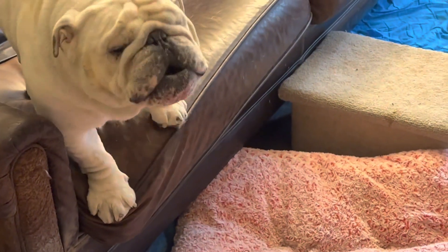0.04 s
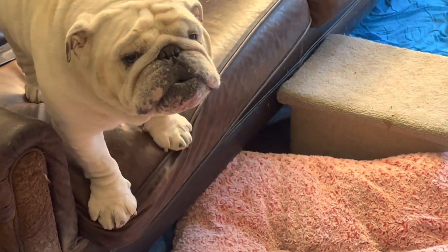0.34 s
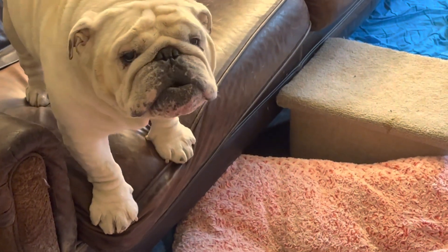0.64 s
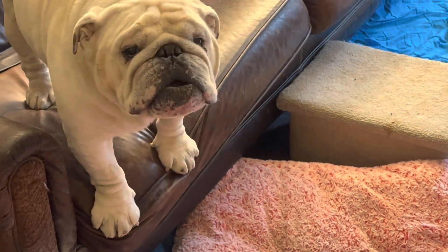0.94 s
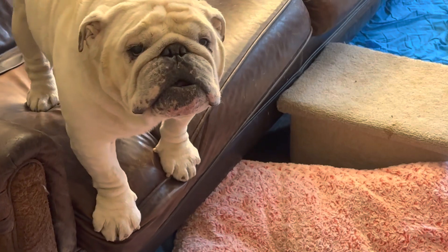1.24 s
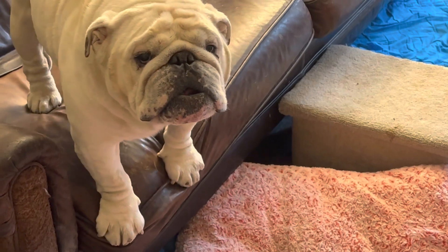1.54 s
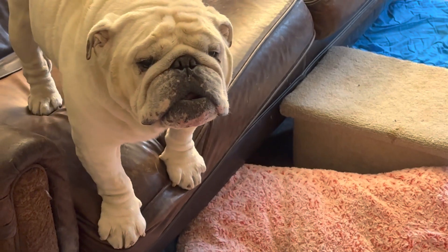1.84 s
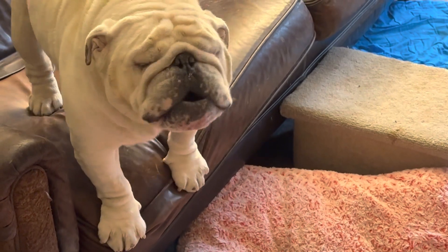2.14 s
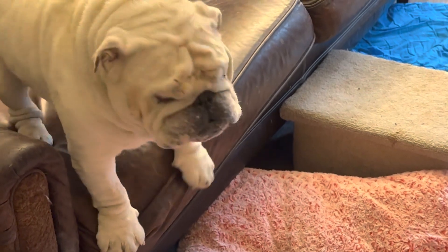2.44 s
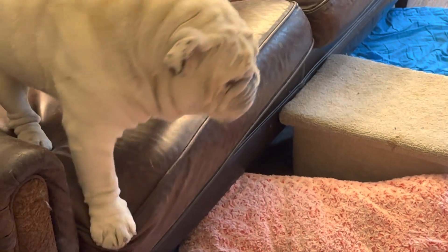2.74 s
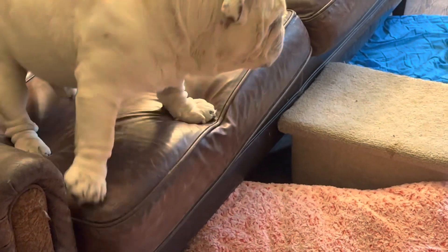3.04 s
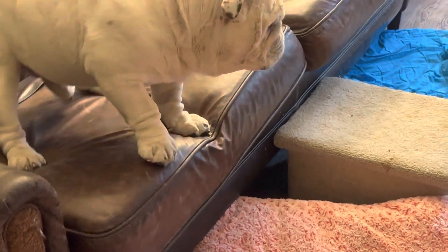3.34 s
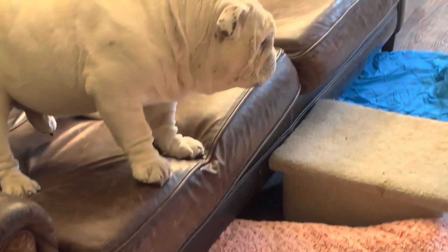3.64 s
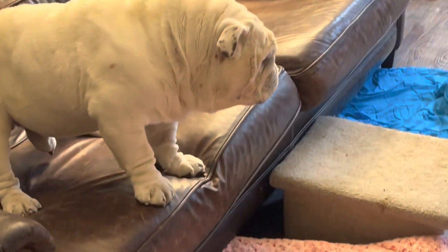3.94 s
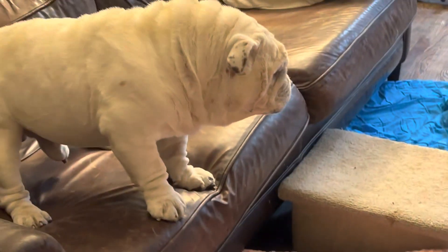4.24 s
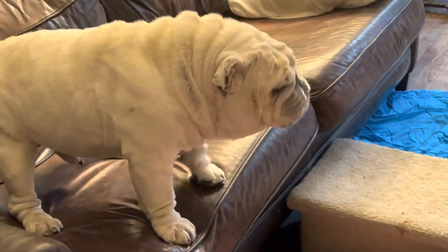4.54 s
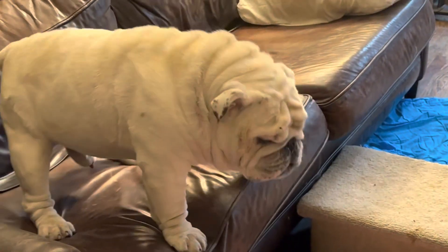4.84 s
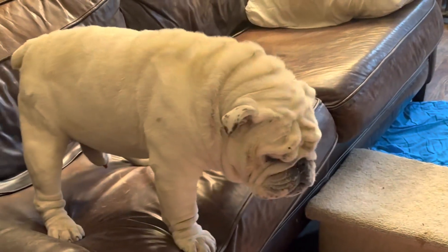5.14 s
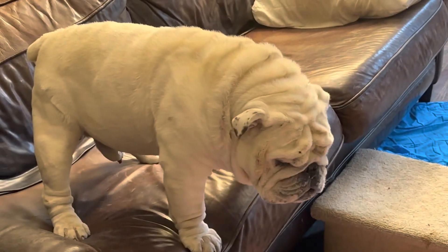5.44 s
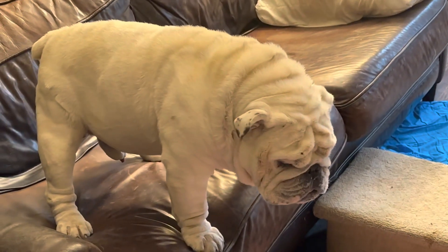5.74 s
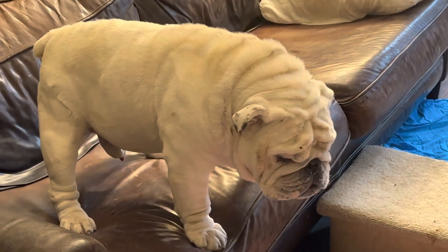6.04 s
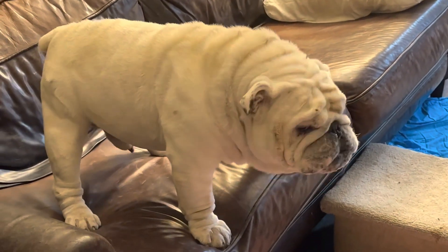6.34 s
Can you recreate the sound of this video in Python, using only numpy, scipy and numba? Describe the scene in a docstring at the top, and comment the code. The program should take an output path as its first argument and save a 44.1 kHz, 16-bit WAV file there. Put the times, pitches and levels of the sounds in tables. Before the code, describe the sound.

Four short, rough dog barks about two seconds apart, with quieter throaty grumbling and snorting in between, close by indoors.

```python
"""A bulldog on a leather couch gives four hoarse barks in a living room, a metre from a phone.
Each bark is a rough voice that rings in throat and mouth and surges as the jowls (loose cheeks) flap.
A snort of air follows the second and third. In between the dog grumbles: its soft palate, at the back
of the mouth, flaps slowly over a low rattle and the hiss of its short nose.
Paws thud twice on the cushion, the room echoes, and the house rumbles faintly."""
import sys
import numpy as np
from scipy import signal
from scipy.fft import rfft, irfft
from scipy.io import wavfile
from scipy.ndimage import uniform_filter1d, minimum_filter1d
from numba import njit

SR = 44100
rng = np.random.default_rng(int(sys.argv[2]) if len(sys.argv) > 2 else 0)


def transcribe(u):
    """Save the signal u as a 16-bit wav file named by the first command-line argument.

    u: samples, shape (n,) or (channels, n), limited to [-1, 1]; the rate is SR.
    q: integer samples, one column per channel.
    """
    v = np.clip(np.atleast_2d(u).T, -1, 1)
    q = np.round(v * 32767).astype(np.int16)
    wavfile.write(sys.argv[1], SR, q)


N = 282668
T = np.arange(N) / SR

# how throat and mouth shape the voice, one list per bark: f/Hz, level/dB
THROATS = [
    [(65, -53), (110, -23), (130, -32.5), (184, -13.5), (231, -16.5), (285, -8), (350, -11.5), (481, -4),
     (599, -6), (690, -17.5), (897, -19.5), (1070, -15.5), (1180, -12), (1500, -37.5), (1950, -74),
     (3300, -120)],
    [(65, -54), (110, -24), (151, -30.5), (194, -6.5), (226, -14), (339, -3), (382, -10), (486, -4),
     (573, -2), (690, -13), (762, -11), (958, -19.5), (1210, -9), (1500, -29), (1950, -60.5), (3300, -120)],
    [(65, -58), (110, -18), (217, -18.5), (252, -15.5), (297, -29.5), (332, -3), (366, -2.5), (456, -1.5),
     (555, -8.5), (612, -11.5), (897, -18.5), (1130, -22), (1220, -19.5), (1500, -24), (1950, -67),
     (3300, -120)],
    [(65, -55), (110, -31.5), (201, -11), (250, -7), (318, -0.5), (400, 4), (441, -12), (497, -1),
     (549, -5.5), (626, 0), (831, -4), (958, -9.5), (1300, -7), (1500, -20), (1950, -49.5), (3300, -120)],
]
# the gliding note at which the nose rings in the long grumble: t/s, f/Hz, level/dB
NOSE_RING = [(.6, 1280, -69), (.86, 1580, -66), (.96, 1630, -49), (1.1, 1673, -58), (1.4, 1820, -65.5),
             (1.75, 1790, -66), (1.95, 1800, -60.5)]


def barks():
    """Vocal folds and puffs of breath ring throat, mouth and muzzle; flapping jowls make it surge."""
    # one bark a row: start/s, length/s, level/dB, mouth at start/dB, mouth at end/dB, snarl/dB, rasp/dB,
    # snarl fade/(dB/s), top pitch/Hz, highest throat ring/Hz, mouth ring at start/Hz, snarl ring/Hz,
    # jowl flapping/Hz, build-up/s
    bark_rows = [(-.04, .17, -14.5, -1.5, -8, -18.5, -24.5, 92, 191.1, 527, 920, 2495, 38.37, .02),
                 (2.09, .176, -15.5, -12.5, 1.5, -22.5, -25.5, 13, 185.9, 542, 1004, 2550, 39.9, 0.0059),
                 (4.26, .18, -15.5, -4, -5.5, -20.5, -24.5, 80.5, 207.7, 392, 1127, 2455, 39.72, 0.0095),
                 (6.136, 0.1848, -17.5, -5.5, -2, 0, -20, 177, 205.7, 614, 1300, 1711, 35.43, 0.015)]
    top_s, rise_hz_per_s, sag_hz_per_s = .05, 480, 290  # the pitch climbs with the push, then sags
    jaw_swing, shut_hz = .66, 740
    out = np.zeros(N)
    for row, throat in zip(bark_rows, THROATS):
        start, length, level_db, open_db, close_db, snarl_db, rasp_db, fade_db_per_s = row[:8]
        top_hz, throat_hz, mouth_hz, snarl_hz, jowl_hz, build_s = row[8:]
        age, gate = envelope(start, length, attack=.014, release=.032)
        progress = age / length
        pitch = top_hz - np.maximum(rise_hz_per_s * (top_s - age), sag_hz_per_s * (age - top_s))
        folds, phase = pulses(pitch, jitter=.1, shimmer_db=1.5)
        breath = unit(rng.standard_normal(len(age)) * np.exp(-phase / 1.7))
        source = colour(unit(folds) + .5 * breath, throat)
        low, high = band(source, 120, 680), band(source, 611, 1500)
        # the lower ring rises and falls with the jaw; the upper one sinks as the mouth shuts
        arch_hz = throat_hz * (1 - jaw_swing * (1 - np.sin(np.pi * progress)))
        sink_hz = mouth_hz + (shut_hz - mouth_hz) * progress
        low = unit(low) + .67 * unit(resonate(low, arch_hz, width_hz=120.))
        mouth = unit(high) + .64 * unit(resonate(high, sink_hz, width_hz=87.))
        mouth_gain = amp(open_db + (close_db - open_db) * progress)
        chest = unit(band(breath, 55, 120, order=3))
        voice = steady(low, .012) + mouth_gain * steady(mouth, .0026) + amp(-31.5) * chest
        snarl, rasp = muzzle(breath + .28 * unit(folds), progress, snarl_hz)
        fade_db = fade_db_per_s * age
        edge = amp(snarl_db - fade_db) * snarl + amp(rasp_db - .48 * fade_db) * rasp
        surge_db = jowls(age, progress, jowl_hz)
        slack = np.exp(-age / build_s)  # the bark starts weak and builds up
        sound = amp(surge_db - 6.5 * slack) * voice + amp(.18 * surge_db - 12.5 * slack) * edge
        add(out, start, gate * amp(level_db) * sound)
    return out


def muzzle(air, progress, snarl_hz):
    """Rushing air rings the muzzle, giving a bright snarl and a higher rasp."""
    # the muzzle's high rings: f/Hz, base width/Hz, level/dB
    muzzle_rings = [(1506, 41, 8), (1766, 83, 3), (1830, 90, 1), (2600, 63, -1.5), (3652, 500, 0.5),
                    (5140, 380, -3), (7130, 500, -1.5), (8320, 660, -1.5), (9100, 660, -5.5),
                    (14000, 2000, -23)]
    rings = 0
    for hz, width, db in muzzle_rings:
        # each ring wavers and sinks as the jaw closes
        centre = hz * (1 + .02 * wander(progress, count=5) + .032 * np.cos(np.pi * progress))
        rings += amp(db) * resonate_twice(air, centre, 1.5 * width)
    ring_hz = snarl_hz * (1 + .02 * wander(progress, count=6))
    main_ring = unit(resonate(air, ring_hz, width_hz=190.))
    bite = unit(resonate_twice(air, 2.16 * ring_hz, width_hz=900))
    snarl = band(unit(band(rings, 1400, 2700)) + main_ring, 1400, 2850)
    rasp = band(rings + .05 * air, 3300, 16000)
    return steady(snarl, .05) + amp(-13) * bite, steady(rasp, .021)


def jowls(age, progress, flap_hz):
    """Level change in dB: each flap of the jowls gives a surge, no two equally strong."""
    peak_at, width = .26, .25  # shares of one flap
    phase = (flap_hz * age + .04 * wander(progress, count=8)) % 1
    strength_db = 8 * (1 + .37 * wander(progress, count=7))
    distance = np.sin(np.pi * (phase - peak_at)) / (np.pi * width)
    return strength_db * np.exp(-distance ** 2) - 1.5


def lead_ins():
    """Just before two of the barks, a soft voice swells behind the still closed mouth."""
    # swells: time of full strength/s, rise/s, level/dB
    swells = [(2.1, .085, -27.5), (4.265, 0.029, -30)]
    out = np.zeros(N)
    for full, rise, db in swells:
        age, gate = envelope(full - rise, rise + .011, attack=.005, release=.0077)
        folds, _ = pulses(np.full(len(age), 168.), jitter=.085, shimmer_db=3)
        source = colour(unit(folds) + 1.8 * rng.standard_normal(len(age)), THROATS[0])
        voice = steady(band(source, 200, 700, order=3), .012)
        add(out, full - rise, gate * amp(db - 30 * (1 - age / rise)) * voice)
    return out


def snorts():
    """Air rushing through the short nose swells and dies, with a fluttering grunt just ahead of it."""
    # snorts: peak time/s, hiss/dB, grunt/dB
    snort_rows = [(2.375, -34, -32.5), (4.595, -38, -33.5)]
    # tone of the rushing air: f/Hz, level/dB
    hiss_shape = [(700, -39.5), (1000, -6), (1600, 0.5), (2100, -6), (2550, -4), (2900, -9), (3400, 2),
                  (4000, 1), (5000, -15.5), (6800, -1), (8500, -8.5), (9700, -14.5), (11000, -11),
                  (15000, -16.5)]
    # tone of the grunt: f/Hz, level/dB
    grunt_shape = [(47, -7), (80, -2), (330, -1), (505, -5), (565, 4), (674, -10.5), (773, -3), (866, -15),
                   (945, -5.5), (1600, -10), (2080, -68), (3520, -120)]
    rise_s, fall_s, grunt_lead_s = .06, .072, .023
    swell = lambda t: np.exp(-(t / np.where(t < 0, rise_s, fall_s)) ** 2)
    out = np.zeros(N)
    for peak, hiss_db, grunt_db in snort_rows:
        start = peak - 2 * rise_s
        age, gate = envelope(start, 2 * rise_s + 3 * fall_s, attack=.01, release=.04)
        flutter, phase = pulses(np.full(len(age), 120.), jitter=.31, shimmer_db=3.5)
        hiss = unit(colour(rng.standard_normal(len(age)) * (1 - .35 * phase), hiss_shape))
        grunt = steady(colour(unit(flutter) + 2.4 * rng.standard_normal(len(age)), grunt_shape), .025)
        from_peak = start + age - peak
        hiss *= amp(hiss_db) * swell(from_peak)
        grunt *= amp(grunt_db) * swell(from_peak + grunt_lead_s)
        add(out, start, gate * (hiss + grunt))
    return out


def palate_flaps():
    """Each flap pops in the throat and rings nose, mouth and chest; the palate lands with a soft bump."""
    out, t = np.zeros(N), T[:SR // 10]
    ring_times, ring_hz, _ = np.transpose(NOSE_RING)
    for start, db, base_hz, nose_db in flap_events():
        chance = rng.standard_normal(4)
        hz = base_hz * (1 + .054 * chance[3])
        nose_hz = np.interp(start, ring_times, ring_hz) * (1 + .038 * chance[1])
        throat = pop(.81 * hz, fall_hz=386, turns=2.97)
        nose = ping(t, nose_hz, attack=.0016, decay=.016)
        mouth = ping(t, 1.902 * hz, attack=.0071, decay=.035)
        chest = pop(75 * (1 + .087 * chance[0]), fall_hz=260, turns=2.1)
        bump = pop(165, fall_hz=240, turns=1.5)
        add(out, start, amp(db + .5) * throat + amp(nose_db + 12.5) * nose)
        add(out, start + .00086, amp(db - 8.5) * mouth)
        add(out, start + .0098, amp(db - 12) * chest)
        add(out, start + .029 + .003 * chance[2], amp(db - 11) * bump)
    return out


def flap_events():
    """List the palate's flaps, evenly spaced in each run: t/s, level/dB, base pitch/Hz, nose level/dB."""
    # runs of flaps: first/s, last/s, count, first level/dB, last level/dB, base pitch/Hz, nose offset/dB
    runs = [(0.592, 0.645, 2, -35.5, -32, 463, -22), (0.674, 0.739, 2, -23, -33, 495, -34),
            (.886, 0.934, 2, -33, -27.5, 515, -38), (0.9506, 1.045, 3, -20, -33.5, 484, -20),
            (1.099, 1.209, 3, -23, -22.5, 398, -22), (1.27, 1.334, 2, -24, -31.5, 382, -21),
            (1.4, 1.81, 8, -26, -27.5, 340.6, -21), (3.076, 3.289, 4, -32.5, -30.5, 391, -29),
            (3.382, 3.548, 2, -49, -54, 393, -30), (3.458, 3.589, 2, -32, -42, 171.5, -31),
            (3.677, 3.78, 3, -36.5, -39, 109.3, -28), (4.921, 4.939, 2, -36.5, -35.5, 334, -32),
            (5.293, 5.346, 2, -44.5, -39.5, 328, -25), (5.539, 5.6647, 2, -36.5, -35.5, 332, -41)]
    events = []
    for first, last, count, first_db, last_db, hz, nose_db in runs:
        for start, db in np.linspace((first, first_db), (last, last_db), count):
            events.append((start, db, hz, db + nose_db))
    return events


def pop(hz, fall_hz, turns):
    """A round note that drops onto its pitch as the airway opens; more turns make it ring longer."""
    t = T[:SR // 10]
    cycles = np.cumsum(hz + fall_hz * np.exp(-t / .0029)) / SR
    ring = np.sin(2 * np.pi * cycles) * np.exp(-cycles / turns - t / .087)
    return band(ring, 38, 1.2 * (hz + fall_hz), order=3)


def ping(t, hz, attack, decay):
    """A pocket of air rings at one pitch, losing 60 dB in `decay` seconds."""
    return np.sin(2 * np.pi * hz * t) * (1 - np.exp(-t / attack)) * amp(-60 * t / decay)


def grumbles():
    """Loose tissue rattles in the throat, mostly fading as the air runs out."""
    # grumbles: start/s, length/s, starting level/dB, fade/(dB/s) (a negative fade swells)
    grumble_rows = [(.565, 0.2, -43.5, 13), (.875, 1.0, -43, 6), (2.68, 0.49, -61, -23),
                    (3.05, 0.83, -37, 48.5), (4.86, 0.17, -42, 31), (5.26, 0.52, -48.5, 13.5)]
    # tone of the throat in the first two grumbles, then in the later four: f/Hz, level/dB
    rattle_shapes = [
        [(25, -24.5), (65, 9), (120, -2), (185, 7.5), (240, -4.5), (380, 3), (560, -14), (770, -10),
         (1050, -32.5), (1500, -26), (2200, -62.5)],
        [(25, -30), (90, 6), (175, -3.5), (250, -9.5), (400, -1), (500, -13), (750, -16.5), (1100, -26),
         (1500, -31), (2200, -82.5)],
    ]
    early, late = rattle_shapes
    out = np.zeros(N)
    for k, (start, length, db, fade_db_per_s) in enumerate(grumble_rows):
        age, gate = envelope(start, length, attack=.028, release=.02)
        slaps, _ = pulses(np.full(len(age), 64.), jitter=.24, shimmer_db=5.5)
        source = colour(unit(slaps) + rng.standard_normal(len(age)), early if k < 2 else late)
        rattle = steady(band(source, 79, 2200, order=3), .048)
        add(out, start, gate * amp(db - fade_db_per_s * age) * rattle)
    return out


def whistles():
    """Air rings gliding notes in nose, throat and mouth, strongest just after each palate flap."""
    # the throat's ring in a low moan that opens upward: t/s, f/Hz, level/dB
    moan_throat = [(2.78, 160, -48.5), (2.98, 171, -43), (3.05, 198, -45), (3.085, 408, -36),
                   (3.2, 466, -40.5), (3.4, 417, -56.5), (3.6, 396, -52)]
    # the mouth's sinking ring in that moan: t/s, f/Hz, level/dB
    moan_mouth = [(3.07, 1190, -61), (3.22, 980, -55), (3.38, 940, -82)]
    out = np.zeros(N)
    for glide, width_hz, pulsing in (NOSE_RING, 130, 4.4), (moan_throat, 96, 3.1), (moan_mouth, 110, 1.5):
        times, hz, db = np.transpose(glide)
        t = T[int(times[0] * SR):int(times[-1] * SR)]
        gate = np.clip((t - t[0]) / .0034, 0, 1) * np.clip((t[-1] - t) / .03, 0, 1)
        ring = resonate_twice(rng.standard_normal(len(t)), np.interp(t, times, hz), width_hz)
        puffs = sum(puff(t - s, rise=.002, fall=.0082) for s, *_ in flap_events())
        gain = amp(np.interp(t, times, db)) * (1 + pulsing * puffs) / (1 + .22 * pulsing)
        add(out, t[0], gate * gain * steady(ring, .018))
    return out


def nose_air():
    """Breath hisses quietly in the nose; each palate flap lets a puff through."""
    # breaths: start/s, length/s, level/dB
    breaths = [(0.215, 0.41, -59.5), (0.547, 1.48, -60.5), (2.416, 0.51, -59), (2.844, 0.52, -60),
               (2.957, 0.38, -56), (3.2, 0.49, -65.5), (4.74, 1.21, -63.5)]
    # tone of the nose: f/Hz, level/dB
    nose_shape = [(590, -22.5), (1000, -6), (1420, -9), (1630, -6), (1970, -9.5), (2140, -15.5),
                  (2830, -7.5), (3910, -6.5), (4730, -23.5), (6730, -10.5), (7550, -14), (8620, -14.5),
                  (9760, -27), (12700, -62), (21500, -120)]
    out = np.zeros(N)
    for start, length, air_db in breaths:
        age, gate = envelope(start, length, attack=.06, release=.22)
        t = start + age
        puffs = sum(amp(db + 34.5) * puff(t - s, rise=.004, fall=.0067) for s, db, *_ in flap_events())
        hiss = unit(colour(rng.standard_normal(len(t)), nose_shape))
        add(out, start, gate * amp(air_db) * (1 + puffs) * hiss)
    return out


def paws():
    """Paws land on the cushion with soft, low thuds."""
    # thuds: t/s, level/dB
    thuds = [(3.041, -36), (4.042, -37.5)]
    out, t = np.zeros(N), T[:SR // 8]
    rise = t / .0042
    for start, db in thuds:
        add(out, start, amp(db) * rise * np.exp(1 - rise) * np.sin(2 * np.pi * 80 * t))
    return out


def room(dry, wet_db):
    """Walls and furniture add a wash of echoes; left and right hear nearly the same bass."""
    # how long the echoes last: f/Hz, time to fade by 60 dB/s
    echo_times = [(120, 0.58), (500, 0.63), (1500, 0.45), (8000, 0.48)]
    t = T[:int(.7 * SR)]
    tails = np.zeros((2, len(t)))  # what both sides share, and what sets them apart
    for low_hz in 50 * 2 ** np.arange(9):
        apart = min(low_hz / 600, .55)
        decay = amp(-60 * t / along(1.7 * low_hz, echo_times))
        octave = band(rng.standard_normal((2, len(t))), low_hz, 2 * low_hz, order=3)
        tails += octave * decay * np.array([[1], [apart]])
    tails *= np.clip((t - .003) / .0026, 0, 1) * (1 + .96 * np.exp(-t / .013))  # gap, then strong echoes
    mid, side = (signal.fftconvolve(dry, tail / np.linalg.norm(tails[0]))[:N] for tail in tails)
    return dry + amp(wet_db) * (mid + np.array([side, -side]))


def room_tone(level_db):
    """The house rumbles and hisses, faint and steady."""
    # tone of the house: f/Hz, level/dB
    house_shape = [(15, -51), (25, -12), (65, 4), (268, -8.5), (390, -8), (500, -20), (784, -15.5),
                   (981, -22.5), (1200, -15), (1500, -24.5), (1930, -14), (2660, -13.5), (3420, -21.5),
                   (6070, -20), (9760, -36), (12700, -64.5), (21500, -120)]
    mid, side = (unit(colour(rng.standard_normal(N), house_shape)) for _ in range(2))
    return amp(level_db) * (mid + .13 * np.array([side, -side]))


def amp(db):
    """Turn decibels into a gain."""
    return 10 ** (np.asarray(db) / 20)


def unit(x):
    """Scale to an average strength (rms) of 1."""
    return x / np.sqrt(np.mean(x ** 2) + 1e-18)


def steady(x, seconds):
    """Even out the strength over spans of this length, keeping the finer grain."""
    size = max(int(seconds * SR), 2)
    return x / np.sqrt(np.abs(uniform_filter1d(uniform_filter1d(x ** 2, size), size)) + 1e-12)


def along(hz, points):
    """Read between (f/Hz, value) points, spaced by musical pitch."""
    f, value = np.transpose(points)
    return np.interp(np.log(hz + 1), np.log(f + 1), value)


def colour(x, points):
    """Give a sound the tone outlined by (f/Hz, level/dB) points."""
    size = 4096
    cepstrum = irfft(np.log(amp(along(np.fft.rfftfreq(size, 1 / SR), points))))
    cepstrum[1:size // 2] *= 2  # folded so that the filter rings only after the sound arrives
    cepstrum[size // 2 + 1:] = 0
    return signal.fftconvolve(x, irfft(np.exp(rfft(cepstrum))))[:len(x)]


def band(x, lo_hz, hi_hz, order=4):
    """Keep what lies between two frequencies."""
    sos = signal.butter(order, [lo_hz, min(hi_hz, .49 * SR)], "band", fs=SR, output="sos")
    return signal.sosfilt(sos, x)


@njit
def resonate(x, hz, width_hz):
    """Ring at a pitch that may move (a state-variable band-pass filter)."""
    y, band_state, low_state = np.empty(len(x)), 0., 0.
    for i in range(len(x)):
        tuning, damping = np.tan(np.pi * hz[i] / SR), width_hz / hz[i]
        ring = (band_state + tuning * (x[i] - low_state)) / (1 + tuning * (tuning + damping))
        band_state = 2 * ring - band_state
        low_state += 2 * tuning * ring
        y[i] = damping * ring
    return y


def resonate_twice(x, hz, width_hz):
    """Two passes give a purer ring."""
    return resonate(resonate(x, hz, float(width_hz)), hz, float(width_hz))


def pulses(hz, jitter, shimmer_db):
    """Clicks uneven in timing (jitter) and strength (shimmer), and the place in each cycle, 0 to 1."""
    cycles = np.cumsum(hz) / SR
    chance = rng.standard_normal((int(cycles[-1]) + 2, 2))
    marks = np.sort(np.arange(len(chance)) + jitter * chance[:, 0])
    at = np.searchsorted(cycles, marks)
    train = np.bincount(at, amp(shimmer_db * chance[:, 1]), len(hz) + 1)[:len(hz)]
    return train - train.mean(), np.interp(cycles, marks, np.arange(len(marks))) % 1


def wander(progress, count):
    """A few random values joined by straight lines over the course of a sound."""
    return np.interp(progress, np.linspace(0, 1, count), rng.standard_normal(count))


def envelope(start, length, attack, release):
    """Seconds since the start, and a gain that fades in, holds and fades out."""
    age = T[max(int(start * SR), 0):int((start + length) * SR)] - start
    return age, np.clip(age / attack, 0, 1) * np.clip((length - age) / release, 0, 1)


def puff(age, rise, fall):
    """The strength of a puff of air: it jumps up and dies away (times in seconds)."""
    return np.clip(age / rise, 0, 1) * np.exp(-np.abs(age) / fall)


def add(out, start, x):
    """Mix a sound in at `start` seconds."""
    i = max(int(start * SR), 0)
    out[i:i + len(x)] += x[:max(N - i, 0)]


def limit(x, ceiling, size):
    """Turn the level down smoothly around any peak above the ceiling."""
    need = np.minimum(1, ceiling / (np.abs(x).max(axis=0) + 1e-9))
    return x * uniform_filter1d(uniform_filter1d(minimum_filter1d(need, 2 * size + 1), size), size)


def scene():
    """The dog's sounds in the living room."""
    dog = palate_flaps() + whistles() + grumbles() + barks() + lead_ins() + snorts() + nose_air() + paws()
    dog = band(dog, 48, 17000, order=2)  # cut the deep rumble below 48 Hz from the dog's sounds
    return room(dog, wet_db=-6) + room_tone(level_db=-57)


def record(dry):
    """The phone's two microphone holes shift left against right; loud peaks are held down."""
    # how far the left wave runs ahead of the right: f/Hz, phase/rad
    phase_leads = [(0, 0), (800, .2), (1400, .2), (1640, .8), (1850, .1), (2900, .65), (4400, .15),
                   (6200, .1), (6900, .7), (7450, 3.1), (8000, 5.9), (8600, 6.1), (9500, 5.3), (10500, 3.6),
                   (12300, 2.3), (13200, .1)]
    hz = np.fft.rfftfreq(N, 1 / SR)
    lead = np.interp(hz, *np.transpose(phase_leads))
    # the treble is dulled above about 10 kHz and cut off above 15 kHz
    treble = amp(along(hz, [(9400, -1), (10600, -17.5), (14000, -8)]))
    top_cut = signal.ellip(8, .2, 70, 15200, fs=SR, output="sos")
    stereo = irfft(rfft(dry) * treble * np.exp(.5j * np.array([lead, -lead])), N)
    return signal.sosfilt(top_cut, limit(stereo, ceiling=.93, size=130))


dry = scene()
out = record(dry)
transcribe(out)
```